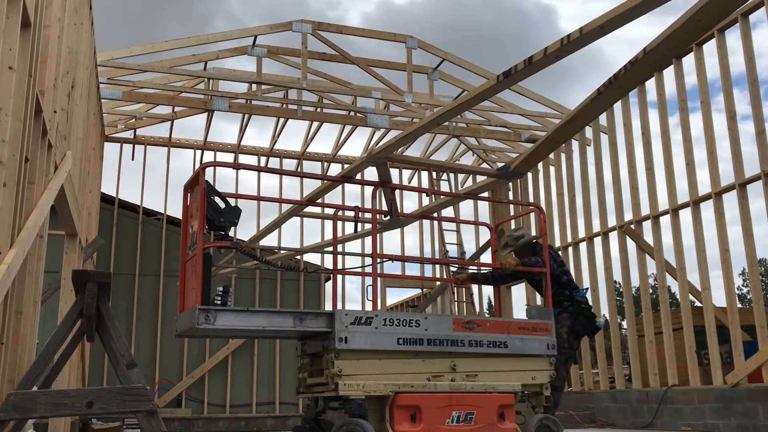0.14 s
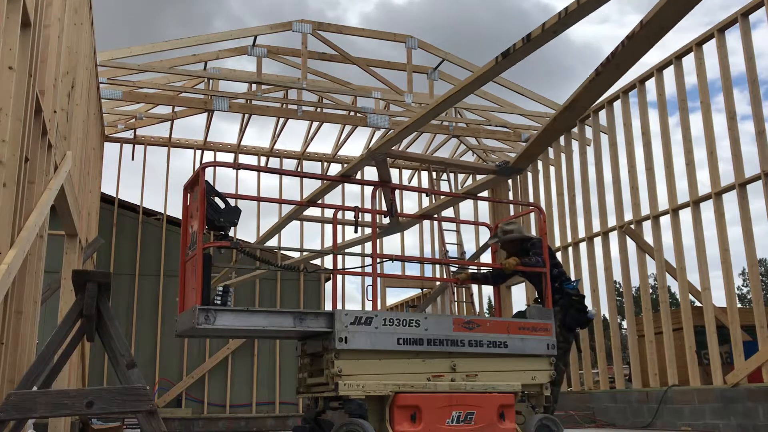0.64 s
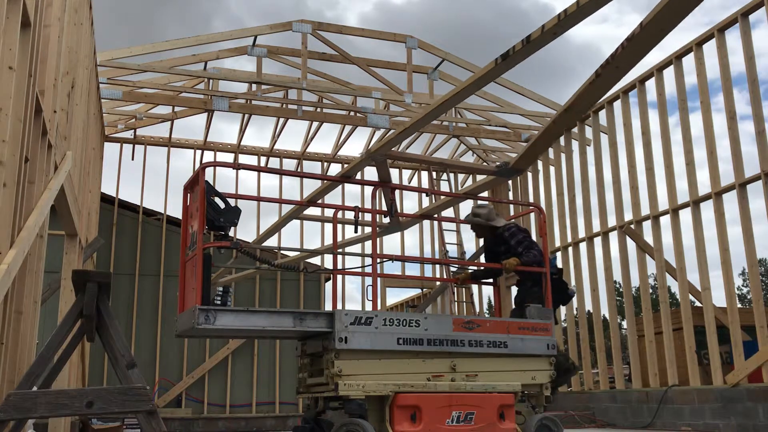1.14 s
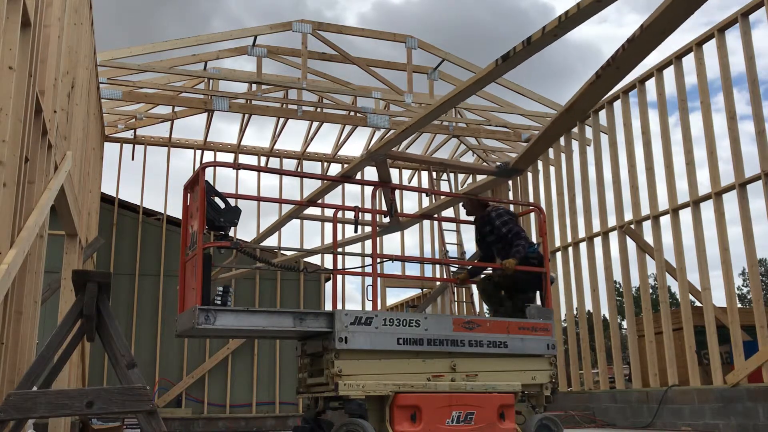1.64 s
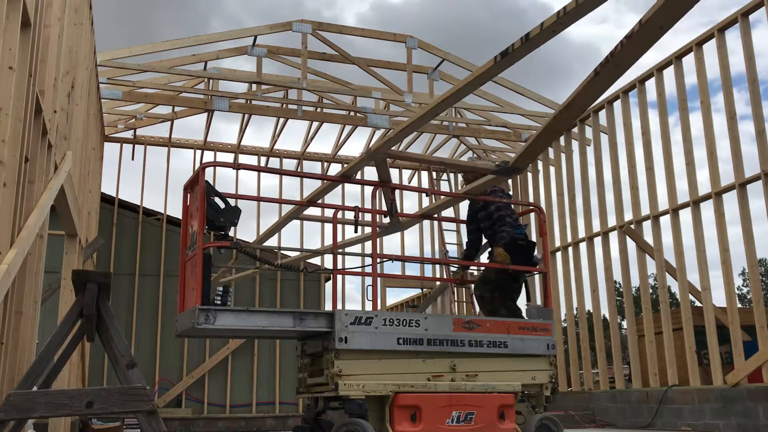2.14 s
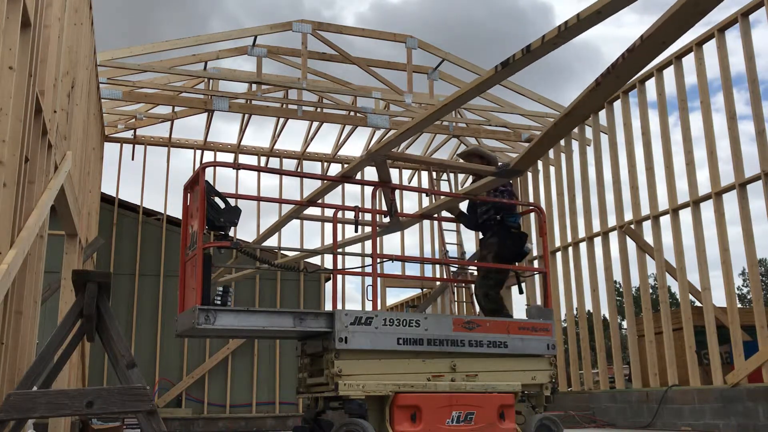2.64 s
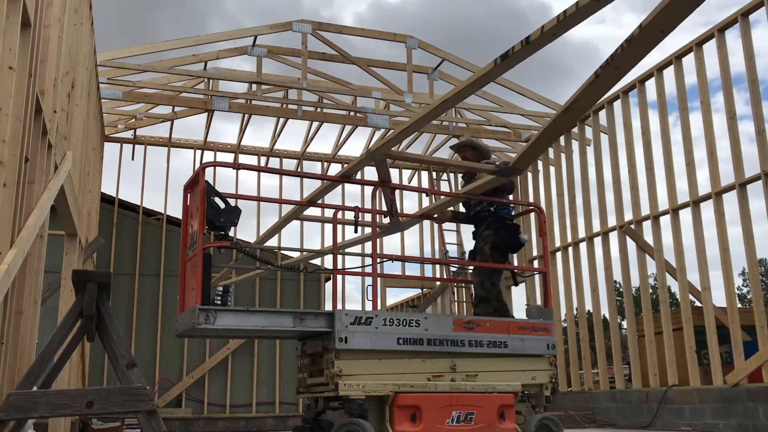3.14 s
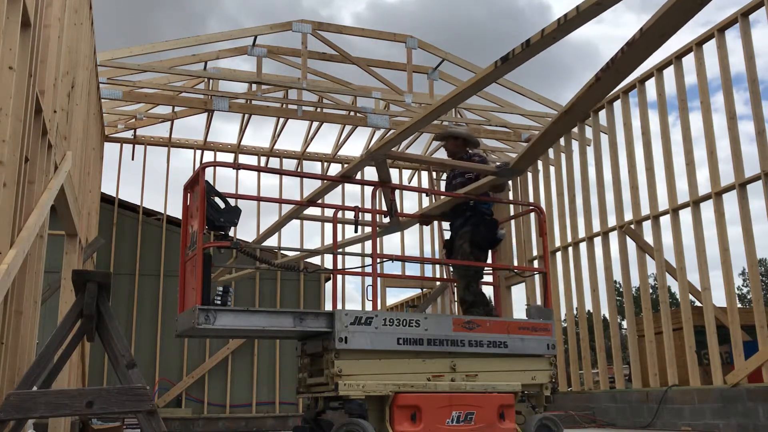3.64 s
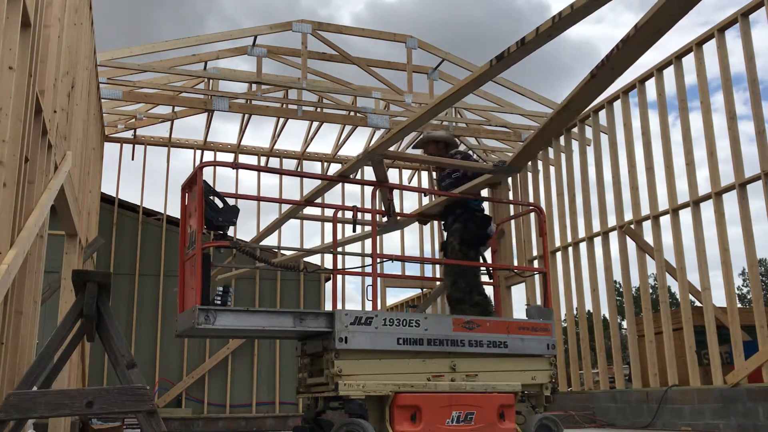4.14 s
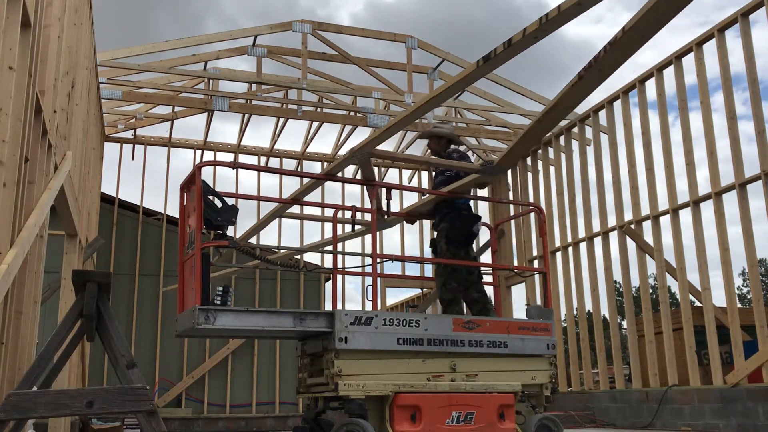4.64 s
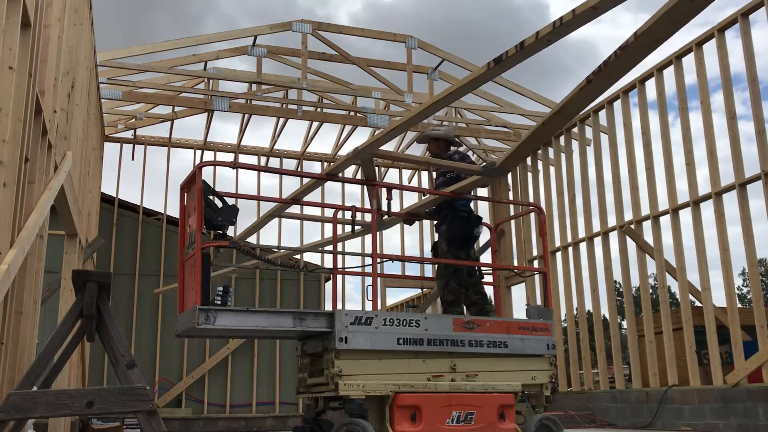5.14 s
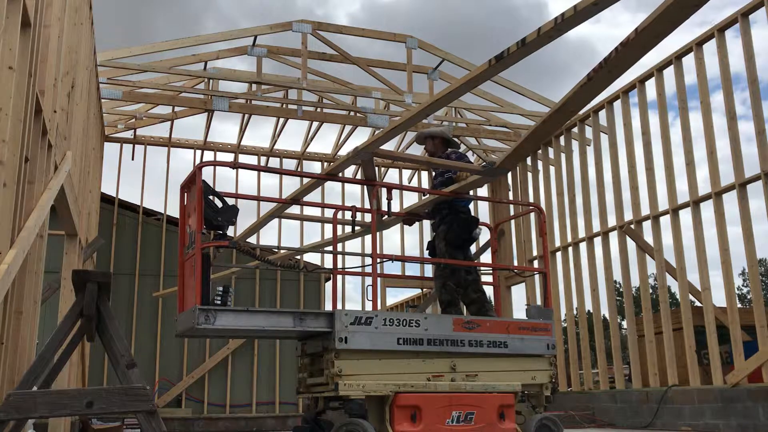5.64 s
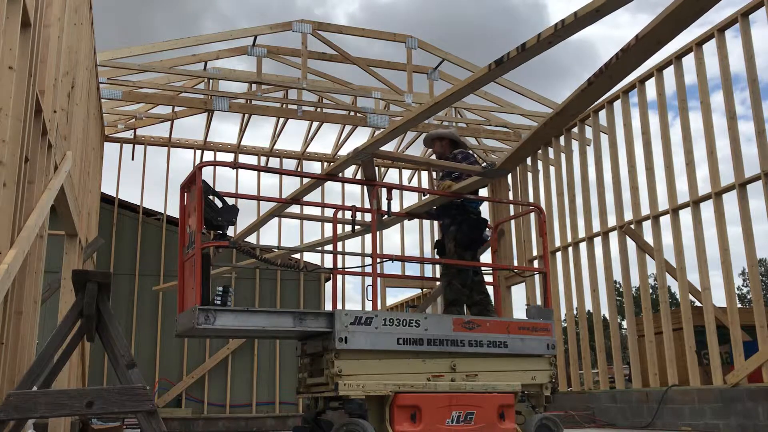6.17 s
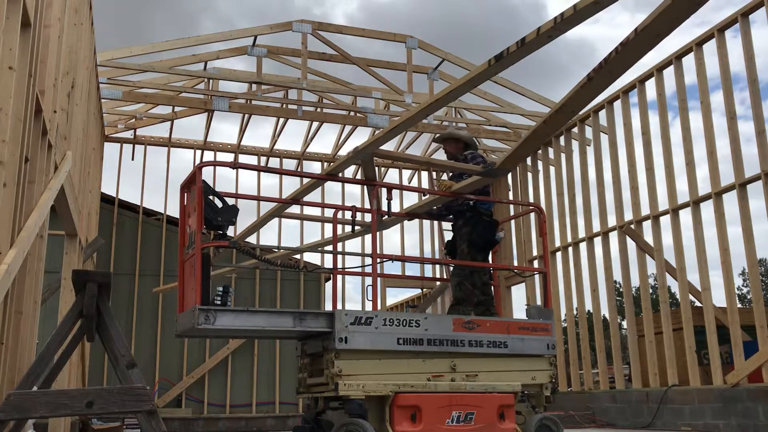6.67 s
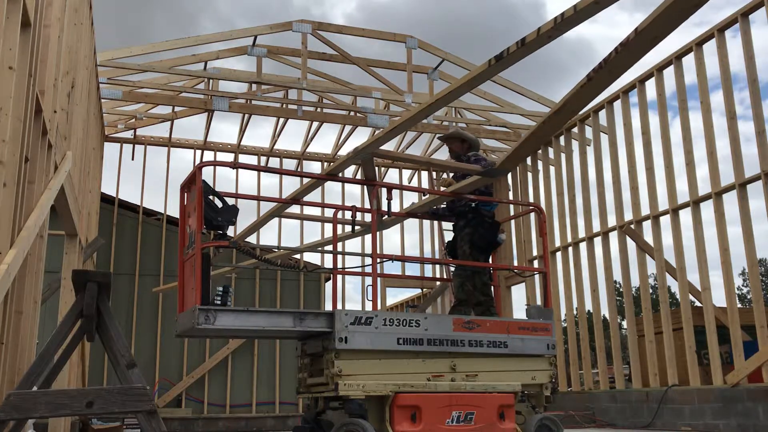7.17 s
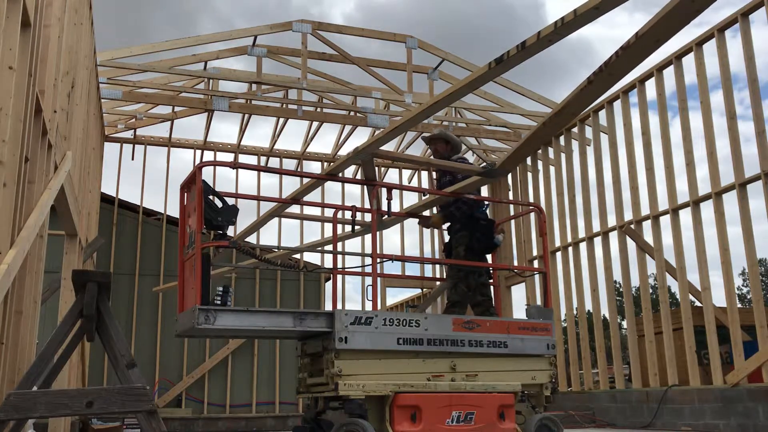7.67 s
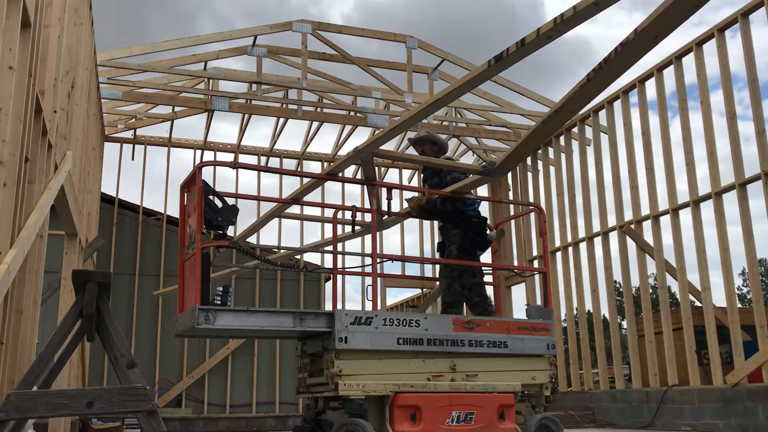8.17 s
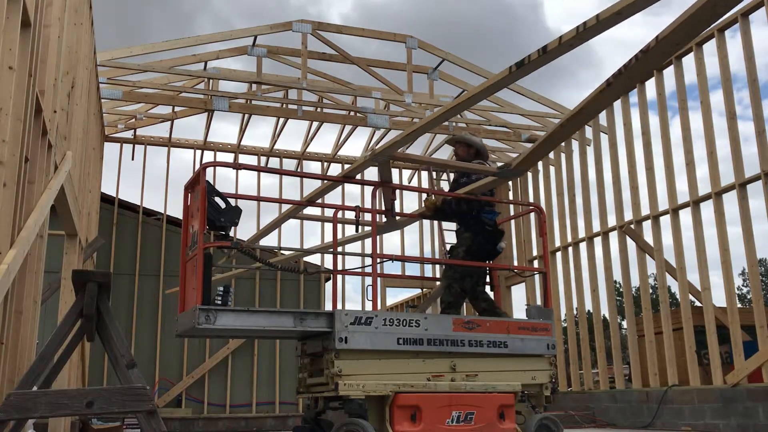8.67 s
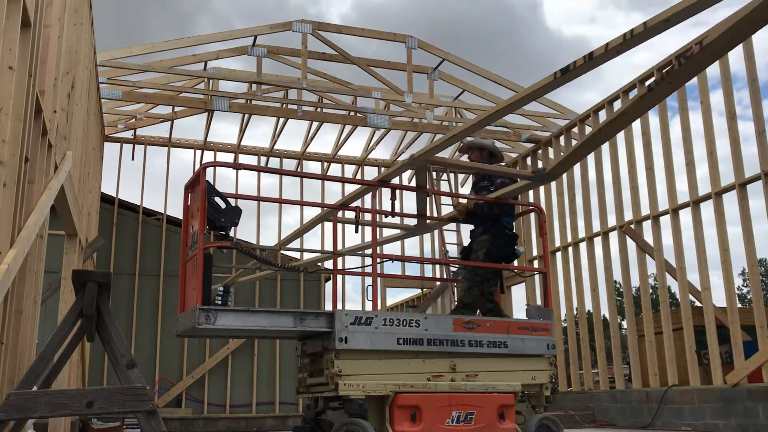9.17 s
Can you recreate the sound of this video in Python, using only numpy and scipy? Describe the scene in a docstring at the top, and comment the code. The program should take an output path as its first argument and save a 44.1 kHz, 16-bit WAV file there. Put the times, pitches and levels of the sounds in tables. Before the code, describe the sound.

Outdoors in an open timber frame, a worker climbs onto a steel lift platform. Boots and timber thud on the hollow deck while rails, fittings and a gate clank and rebound. After about five seconds it thins to low wind buffeting and sparse faint knocks, then a loud hard steel clank with a deep thud comes near the end, followed by small bouncing ticks and scuffing. The microphone stands a little way off, catching wind.

```python
"""Work on a steel lift platform

A worker climbs onto a steel lift platform inside an open timber frame and swings a wooden truss.
Steel rails, fittings and a gate clank: noise bursts excite shared resonances, harder blows for longer.
Boots and timber thud on the deck: a short pitched knock, the board's note and a dispersed boom.
Low-pass noise and a wandering tone make the wind; sines and narrow noise make a bird and faint tones."""
import sys
import numpy as np
from scipy import signal
from scipy.fft import rfft, irfft, next_fast_len
from scipy.io import wavfile
from scipy.ndimage import uniform_filter1d, map_coordinates

SR = 44100
rng = np.random.default_rng(int(sys.argv[2]) if len(sys.argv) > 2 else 0)


def voltage_ratio(level):
    """Linear amplitude factor for a level in decibels (scalar or array-like)."""
    return 10 ** (np.asarray(level, float) / 20)


def digitize_waveform(pressure):
    """Quantize a signal to 16-bit integers and store it at the path in sys.argv[1].

    Rows of a 2-D input are taken as channels; values are limited to [-1, 1].
    """
    field = np.atleast_2d(pressure).T
    bounded = np.clip(field, -1, 1)
    quanta = np.round(bounded * 32767).astype(np.int16)
    wavfile.write(sys.argv[1], SR, quanta)


N = 410130  # length in samples


def unit(x):
    """Normalisation to an rms of 1."""
    return x / np.sqrt(np.mean(x ** 2, axis=-1, keepdims=True) + 1e-20)


def along(points, hz):
    """Interpolation of (f/Hz, value) points on a logarithmic frequency axis."""
    f, value = np.transpose(points)
    return np.interp(np.log(hz + 1), np.log(f + 1), value)


def curve(rows):
    """Linear interpolation of (t/s, value) points, one value per sample."""
    t, value = np.transpose(rows)
    return np.interp(np.arange(N) / SR, t, value)


def wobble(rate):
    """Band-limited random modulation: a smooth curve through `rate` random knots a second."""
    knots = rng.standard_normal(int(N * rate / SR) + 4)
    return map_coordinates(knots, [np.arange(N) * rate / SR])


def swells(rows):
    """Gaussian gain envelopes from (t/s, level/dB, width at half gain/s)."""
    t = np.arange(0, N, 32) / SR
    gain = sum(voltage_ratio(db) * np.exp(-4 * np.log(2) * ((t - s) / length) ** 2) for s, db, length in rows)
    return np.interp(np.arange(N) / SR, t, gain)


def window(start, end, fade):
    """Trapezoidal gain: 1 between two moments, with linear edges."""
    t = np.arange(N) / SR
    return np.clip(np.minimum(t - start, end - t) / fade, 0, 1)


def lay(times, rows):
    """Superposition: adds one row of samples at each moment."""
    at = np.round(times * SR).astype(int)[:, None] + np.arange(rows.shape[1])
    return np.bincount(at.ravel(), rows.ravel(), N + SR)[:N]


def filtered(x, response):
    """Linear filtering: the spectrum of x times a complex response of frequency."""
    m = next_fast_len(x.shape[-1] + 8192)
    return irfft(rfft(x, m) * response(np.fft.rfftfreq(m, 1 / SR)), m)[..., :x.shape[-1]]


def noise(spectrum):
    """Spectral shaping: white noise coloured by (f/Hz, level/dB), with an rms of 1."""
    return unit(filtered(rng.standard_normal(N), lambda f: voltage_ratio(along(spectrum, f))))


def mode(f, hz, width):
    """Damped harmonic resonance: one causal mode with a peak gain of 1."""
    return 1j * f * width / (hz * hz - f * f + 1j * f * width)


def body(modes, scatter_db, count, favour_db=lambda hz: 0, detune=0):
    """Modal superposition over a flat response; every blow wakes the modes at new strengths."""
    small = np.transpose(modes)[0] > 3000  # small loose parts: pitch varies, Q is at most 60
    shift = 1 + detune * rng.standard_normal((count, len(modes), 1)) * small[:, None]
    scatter = scatter_db * rng.standard_normal((count, len(modes), 1))

    def response(f):
        total = 1
        for k, (hz, width, level) in enumerate(modes):
            gain = voltage_ratio(level + scatter[:, k] + favour_db(hz))
            total = total + gain * mode(f, hz * shift[:, k], max(width, small[k] * hz / 60))
        return total
    return response


def blows(times, db, t60, colour, crest_db, rise_s, bright, dull, size, rattle_db):
    """Impact excitation: uneven noise bursts scatter off the studs and the treble decays first."""
    t = np.arange(int(.48 * SR)) / SR - .004
    shake = rng.standard_normal((3, len(times), len(t)))
    tail = voltage_ratio(-60 * t / t60)
    late = dull * unit(uniform_filter1d(shake[0], size=size)) * tail  # smoothed, so duller
    early = shake[1] * (voltage_ratio(-60 * t / (bright * t60)) + 0.18 * tail)
    slow = unit(uniform_filter1d(uniform_filter1d(shake[2], size=200), size=200))
    bursts = slow + 0.27 * unit(uniform_filter1d(shake[2], size=30))
    uneven = voltage_ratio(rattle_db * bursts * np.clip(t / 0.0048, 0, 1))  # the first contact is always firm
    rise = 1 - np.exp(-np.maximum(t, 0) / rise_s)
    # a brief hard strike leaves the modes ringing free
    contact = 0.77 * shake[1] * (t > 0) * voltage_ratio(-60 * t / 0.021)
    power = np.abs(colour(np.linspace(0, SR / 2, num=4000))) ** 2
    level = voltage_ratio(db - crest_db) / np.sqrt(np.mean(power, axis=1))
    rows = filtered(rise * uneven * (early + late) + contact, colour) * level[:, None]
    fade_in = np.minimum(np.arange(len(t)) / 60, 1)
    return lay(times - .005, rows * fade_in)


# steady buffeting: t/s, rms level/dB
BUFFET_LEVEL = [(0, -51.5), (6.8, -51), (7.1, -57), (8.1, -58), (8.3, -49.5), (9.3, -53)]
# spectrum of the buffeting: f/Hz, relative level/dB
BUFFET_SPECTRUM = [(12, -10), (20, -4.5), (43, 2.5), (65, 1), (250, -28), (320, -75), (550, -120)]
# gusts: t/s of the peak, level/dB, width at half gain/s
GUSTS = [(.05, -32.5, 0.047), (.93, -40, 0.037), (1.13, -51.5, 0.031), (1.82, -40.5, 0.13),
         (2.05, -32.5, 0.017), (3.63, -43, 0.045), (4.69, -45, 0.05), (5.52, -35, 0.033),
         (5.85, -31.5, 0.083), (6.24, -41.5, 0.095), (6.5, -34.5, 0.28), (6.66, -34.5, 0.09),
         (8.22, -48, 0.13)]
# spectrum of the far hiss: f/Hz, relative level/dB
HISS_SPECTRUM = [(120, -7), (200, -2.5), (305, -13), (401, -14.5), (7680, -34), (13300, -34.5),
                 (16000, -33)]
HISS_DB = -62.5  # rms


def wind():
    """Turbulent pressure: lumps shake the microphone, gusts near one pitch, over a steady far hiss."""
    hz = 56 + 7 * wobble(13)
    throb = np.sqrt(2) * np.sin(2 * np.pi * np.cumsum(hz) / SR)
    steady = unit(noise(BUFFET_SPECTRUM) * voltage_ratio(3.5 * wobble(7.2))) * voltage_ratio(curve(BUFFET_LEVEL))
    gusts = unit(throb + 0.91 * noise(BUFFET_SPECTRUM)) * swells(GUSTS)
    return steady + gusts + voltage_ratio(HISS_DB) * noise(HISS_SPECTRUM)


# faint tones: start t/s, end t/s, f/Hz, level/dB
FAINT_TONES = [(4.66, 5.1, 5490, -69), (4.943, 5.26, 1330, -66), (4.94, 5.1, 2200, -70),
               (4.94, 5.2, 3310, -70), (4.93, 5.15, 4400, -71), (6.83, 7.3, 2120, -75)]


def whine():
    """Narrow-band noise: faint fuzzy tones come and go, throbbing."""
    total = 0
    for start, end, hz, db in FAINT_TONES:
        band = filtered(rng.standard_normal(N), lambda f: mode(f, hz, 170) ** 2)
        tone = unit(voltage_ratio(1.7 * wobble(59)) * band)
        total = total + voltage_ratio(db) * tone * window(start, end, 0.05)
    return total


def bird():
    """Frequency modulation: one faint whistle glides up and down in an arch."""
    start_s, length_s, level_db = 6.645, .125, -77
    top_hz, arch_hz = 3170, 300
    u = np.linspace(-1, 1, round(length_s * SR))
    hz = top_hz - arch_hz * np.abs(u) ** 2.6
    whistle = np.sqrt(2 - 2 * u ** 2) * np.sin(2 * np.pi * np.cumsum(hz) / SR)
    return lay(np.array([start_s]), voltage_ratio(level_db) * whistle[None])


# modes of deck and truss: f/Hz, width/Hz, relative level/dB
DECK_MODES = [(149.8, 8.2, 2.5), (280, 11, 4.5), (345, 8.4, 4), (435, 120, 3), (553, 5.5, 7.5),
              (651.3, 20, 7.5), (760, 60, -2)]
# spectrum of the deck's excitation: f/Hz, relative level/dB
DECK_SPECTRUM = [(59, -25), (100, -54), (136, -4.5), (423, -3), (2100, -16), (2800, -76), (5500, -120)]
# modes of rails and fittings: f/Hz, least width/Hz, relative level/dB
STEEL_MODES = [(1326, 24, 4), (1477, 38, -1.5), (1618, 40, 5), (1770, 18, -6.5), (2266, 30, 2),
               (3740, 150, -1.5), (5883, 20, -3), (7340, 27, -17), (8390, 62, 0.5), (9400, 71, 1),
               (12150, 170, 2)]
# spectrum of the steel's excitation: f/Hz, relative level/dB
STEEL_SPECTRUM = [(320, -1.5), (550, 4), (927, -1), (1770, -3), (4830, -6.5), (5800, -6.5), (16000, -26)]
# deck rumble: t/s, level/dB before random wavering
RUMBLE = [(0, -37), (.45, -45.5), (1.2, -59), (1.3, -35.5), (2.1, -50.5), (4.4, -47), (5.3, -63),
          (6.6, -73.5), (6.9, -58), (7.2, -82), (8.5, -85), (8.75, -48), (9.0, -41), (9.12, -38),
          (9.3, -43.5)]
# brushing: t/s of the peak, level/dB before random wavering, width at half gain/s
RUSTLES = [(0, -44.5, 0.041), (4.67, -48.5, 0.098), (2.38, -54.5, 0.28), (4.3, -41, 0.2),
           (5.05, -62.5, 0.42), (5.32, -62.5, 0.065), (5.92, -60.5, 0.33), (6.9, -64.5, 0.13),
           (7.51, -62, 0.062), (7.6, -57.5, 0.047), (8.25, -63.5, 0.072), (8.56, -57, 0.077),
           (9.15, -43.5, 0.19)]


def shuffle():
    """Friction noise through modes: weight shifts on the deck; cloth, gloves and timber brush the rails."""
    deck = body(DECK_MODES, scatter_db=0, count=1)
    rumble = unit(filtered(noise(DECK_SPECTRUM), deck)[0]) * voltage_ratio(curve(RUMBLE) + 2.6 * wobble(14))
    steel = body(STEEL_MODES, scatter_db=0, count=1)
    brighter = lambda f: voltage_ratio(along([(3000, 3.7), (14000, 6.2)], f))
    brush = unit(filtered(noise(STEEL_SPECTRUM), lambda f: steel(f)[0] * brighter(f)))
    return rumble + brush * swells(RUSTLES) * voltage_ratio(1.7 * wobble(60) + 0.55 * wobble(400))


# bounces of a small loose part: t/s, nominal peak level/dB
TICKS = [(4.436, -38), (8.813, -20), (8.866, -20), (8.902, -23), (8.914, -19), (8.9743, -20), (9.0623, -29),
         (9.1393, -23)]


def ticks():
    """Single-mode ringing: a small loose part bounces with one short, high ring."""
    s, db = np.transpose(TICKS)
    hz = 5770 * (1 + 0.019 * rng.standard_normal((len(s), 1)))
    colour = lambda f: 0.077 * (f > 3000) + mode(f, hz, 0.064 * hz)
    return blows(s, db, 0.29, colour, crest_db=15.0, rise_s=0.0015, bright=0.14, dull=0.085,
                 size=2, rattle_db=-2)


# a loose fitting ticks on a rail: start t/s, end t/s, mean gap/s, mean nominal peak level/dB
CHATTER = [(0.283, .51, .0423, -48), (0.82, 1.21, .0467, -50)]


def chatter():
    """Near-periodic impacts: light taps at the fitting's swing rate, each with its own small ring."""
    rows = [(s, db) for start, end, gap, db in CHATTER for s in np.arange(start, end, gap)]
    s, db = np.transpose(rows)
    chance = rng.standard_normal((len(s), 2))
    steel = body(STEEL_MODES, scatter_db=4, count=len(s), detune=.035)
    tilt = [(2000, -7.0), (6000, -1.0)]  # f/Hz, level/dB
    fitting = lambda f: 5 * mode(f, 2040, 63)
    colour = lambda f: voltage_ratio(along(STEEL_SPECTRUM, f) + along(tilt, f)) * (steel(f) + fitting(f))
    return blows(s + 0.00068 * chance[:, 0], db + 2 * chance[:, 1], 0.47, colour, crest_db=8,
                 rise_s=0.0011, bright=0.38, dull=0.51, size=5, rattle_db=1.5)


# boots and timber on the deck: t/s, nominal level/dB, f/Hz of the struck board
THUDS = [(0.011, -30.5, 438), (0.13, -32.5, 740), (0.219, -30, 755), (0.289, -28.5, 280), (0.386, -35, 745),
         (0.533, -31, 810), (0.543, -26.5, 740), (1.028, -33.5, 654), (1.161, -34.5, 660),
         (1.231, -21, 666), (1.48, -22, 625), (1.497, -21, 705), (1.803, -26.5, 238.2), (2.268, -28, 685),
         (2.284, -28.5, 610), (2.329, -25.5, 417), (2.531, -30.5, 478), (2.692, -35, 450),
         (3.314, -19.5, 661), (3.564, -30, 778), (3.574, -27, 732), (3.776, -34, 534), (3.803, -30, 553),
         (4.095, -31, 670), (4.21, -18, 415), (4.28, -23.5, 337), (4.666, -26.5, 357), (4.857, -31, 345),
         (5.473, -42.5, 360), (5.528, -35, 402), (6.083, -36, 625), (7.553, -40, 449), (7.693, -40, 717),
         (8.225, -42.5, 386), (8.256, -43.5, 595), (8.551, -32.5, 463), (8.604, -30, 610),
         (8.642, -26, 793), (8.689, -18.5, 396), (8.7, -22, 149.6), (9.044, -38, 444), (9.111, -34, 750),
         (9.21, -34, 766)]
# boots land softly, timber raps short and the boom follows:
# f/Hz, relative knock level/dB, boom rise time constant/s, knock length/cycles for a -32 dB blow
CONTACT = [(294, -2.5, 0.0027, 2.15), (503, -2.5, 0.0074, 1.3), (740, 6, 0.0061, 2.53)]
# boots damp the deck, timber leaves it ringing: f/Hz, t60/s of the boom's tail
BOOM_DECAY = [(150, 0.95), (250, 0.54), (450, 0.98), (750, 0.99)]
BEND_S, BEND_HZ = .012, 1207.3  # lag scale, and the pitch above which there is no lag
RING_DB, RING_CYCLES = -9, 110  # the board's note relative to the blow, and its cycles to fall 60 dB


def thuds():
    """Dispersion of bending waves: a knock, the struck board's note, then the hollow deck's deeper boom."""
    s, db, hz = np.transpose(THUDS)[..., None]
    cycles = hz * np.arange(SR // 5) / SR
    fundamental = np.sin(2 * np.pi * cycles)
    woody = fundamental + 0.35 * np.sin(2 * np.pi * 1.75 * cycles) * np.exp(-cycles / 3)
    pitch, knock_db, rise_s, turns = np.transpose(CONTACT)
    length = np.interp(hz, pitch, turns) * voltage_ratio(0.15 * (db + 32))
    envelope = (1 - np.exp(-cycles / 0.97)) * np.exp(-(cycles / length) ** 2)
    knock = voltage_ratio(db + np.interp(hz, pitch, knock_db)) * woody * envelope
    ring = voltage_ratio(db + RING_DB - 60 * cycles / RING_CYCLES) * fundamental * (1 - np.exp(-cycles / 2))

    deck = body(DECK_MODES, scatter_db=4, count=len(s))
    board_gain = 4 * np.clip((600 - hz) / 100, .55, 1)

    def colour(f):
        low = np.minimum(f, BEND_HZ)
        # the group delay grows as the frequency falls
        lag = np.exp(-2j * np.pi * BEND_S * (2 * np.sqrt(BEND_HZ * low) - low))
        return voltage_ratio(along(DECK_SPECTRUM, f)) * (deck(f) + board_gain * mode(f, hz, 0.067 * hz)) * lag

    boom = blows(s[:, 0], db[:, 0], along(BOOM_DECAY, hz), colour, crest_db=8.0,
                 rise_s=np.interp(hz, pitch, rise_s), bright=0.28, dull=0.085, size=60, rattle_db=1.5)
    return lay(s[:, 0], knock + ring) + boom


GATE_TREBLE_DB = -6.5  # hardness of the gate's first hit, at which the spectrum has no tilt
# harder contacts favour higher modes: hardness as treble level/dB, f/Hz favoured
FAVOURED = [(-12.5, 2600), (-8.5, 2460), (-7.5, 4800), (-1.5, 7400)]


def steel_blows(hits):
    """Contact stiffness: steel shares its modes, hardness picks those that ring most."""
    s, db, treble_db = np.transpose(hits)[..., None]
    centre = np.interp(treble_db, *np.transpose(FAVOURED))
    favour_db = lambda hz: 10 * np.exp(-(np.log2(hz / centre) / 0.079) ** 2)  # width in octaves
    steel = body(STEEL_MODES, scatter_db=4, count=len(s), favour_db=favour_db, detune=.025)
    slope = [(1500, -0.97), (3500, -0.21), (8000, 0.92)]  # f/Hz, dB per dB of hardness
    tilt = lambda f: (treble_db - GATE_TREBLE_DB) * along(slope, f)
    colour = lambda f: voltage_ratio(along(STEEL_SPECTRUM, f) + tilt(f)) * steel(f)
    t60 = 0.31 * voltage_ratio(0.33 * (db + 39.0))  # harder blows shake more parts, for longer
    return blows(s[:, 0], db[:, 0], t60, colour, crest_db=10.0, rise_s=0.0037, bright=0.3, dull=0.33,
                 size=8, rattle_db=2.5)


# the gate hits its stop and rebounds: t/s, nominal peak level/dB, gap to the rebound/s (0 if none)
GATE_HITS = [(0.0166, -29.5, .069), (1.8563, -30, 0), (1.9595, -32, .0695), (2.121, -33, .0613),
             (2.2821, -27.5, .07), (2.8776, -29, 0), (2.9919, -30, .0712), (3.1626, -31, .0695),
             (3.872, -31, 0), (3.9908, -30.5, .08)]
# its bars ring on: mean f/Hz, mean level/dB relative to the hit, t60/s
GATE_BARS = [(549, -7, 0.22), (1320, -21, 0.2), (1665, -10, 0.18)]
REBOUND_DB, REBOUND_TREBLE_DB = -1.2, -2  # the rebound is weaker and duller


def gate():
    """Impact and rebound: each hit is a steel blow whose bars ring on as damped sines."""
    hits = []
    for s, db, gap in GATE_HITS:
        hits.append((s, db, GATE_TREBLE_DB))
        if gap:
            hits.append((s + gap, db + REBOUND_DB, GATE_TREBLE_DB + REBOUND_TREBLE_DB))
    s, db, _ = np.transpose(hits)[..., None]
    t = np.arange(SR // 4) / SR
    wake = rng.standard_normal((len(hits), len(GATE_BARS), 1))
    bars = 0
    for k, (hz, level, t60) in enumerate(GATE_BARS):
        pitch = hz * (1 + 0.0098 * wake[:, k - 1])
        bars = bars + voltage_ratio(db + level + 2 * wake[:, k] - 60 * t / t60) * np.sin(2 * np.pi * pitch * t)
    return lay(s[:, 0], bars * (1 - np.exp(-t / 0.011))) + steel_blows(hits)


# steel on steel: t/s, nominal peak level/dB, hardness as treble level/dB
CLANKS = [(0.133, -29, -14.5), (0.2304, -36, -8), (0.5429, -28, 0), (0.593, -21.5, -1.5),
          (0.649, -27.5, -5.5), (1.109, -37.5, -3), (1.2408, -19, -6.5), (1.3041, -21.5, -8.5),
          (1.356, -24, -5.5), (1.489, -24, -7.5), (1.6337, -29, -6.5), (1.713, -22, 1), (1.761, -26, -7.5),
          (1.8208, -28, -6), (2.2614, -30.5, -6.5), (2.389, -26, -10.5), (2.62, -28.5, -6),
          (2.642, -26, -9.5), (2.7268, -24.5, 2.5), (2.7403, -29, -4.5), (3.3254, -28.5, -8),
          (3.4023, -30.5, -12), (3.438, -27, -9), (3.5735, -30.5, 0), (3.7241, -29.5, -3),
          (3.77, -24.5, -4.5), (4.129, -29.5, -5.5), (4.188, -28, -7), (4.206, -21.5, 1.5),
          (4.333, -27.5, -12.5), (4.2767, -22.5, -4), (4.504, -32.5, -4), (4.63, -36.5, -6),
          (4.6568, -32, -5), (4.782, -44.5, 1), (4.8326, -26.5, -1), (5.36, -34.5, -10.5),
          (5.5273, -38.5, 3), (5.5777, -34.5, -3), (6.1185, -36.5, -5), (7.338, -45, -9.5),
          (8.4926, -43, -5.5), (8.6001, -26.5, -7.5), (8.629, -16, 20), (8.6345, -10.5, -0.5),
          (8.646, -16.5, -7.5), (8.6492, -15.5, -5), (8.679, -26, -17), (8.7261, -19, -3), (7.223, -44, 5),
          (9.0414, -29.5, -11)]


def clanks():
    """Modal impact: rails and loose fittings strike steel on steel."""
    return steel_blows(CLANKS)


def scene():
    """Superposition of all sources, from the background to the steel."""
    background = wind() + whine() + bird()
    platform = shuffle() + thuds()
    steel = ticks() + chatter() + gate() + clanks()
    return (background + platform + steel)[None]


def top_cut(x):
    """Nothing passes above the cut-off."""
    return signal.sosfilt(signal.butter(12, 16250, fs=SR, output="sos"), x)


def record(dry):
    """Band limitation: the microphone passes from a second-order 29 Hz roll-off up to 16 kHz."""
    heard = filtered(dry, lambda f: (f < 16000) * (f / (f - 1j * 29)) ** 2)
    return top_cut(heard)


dry = scene()
out = record(dry)
digitize_waveform(out)
```